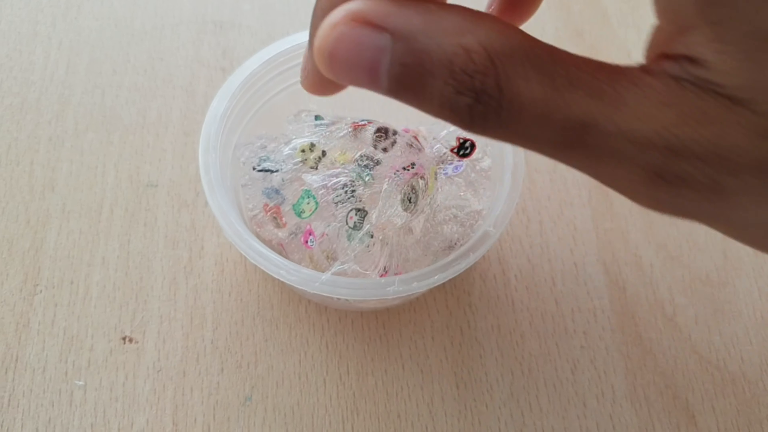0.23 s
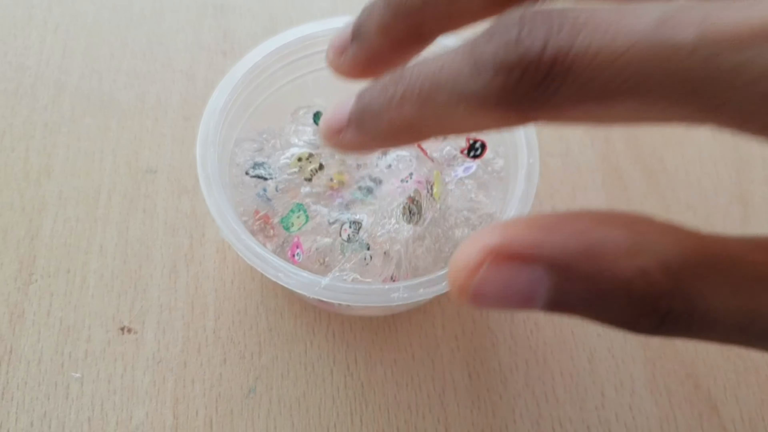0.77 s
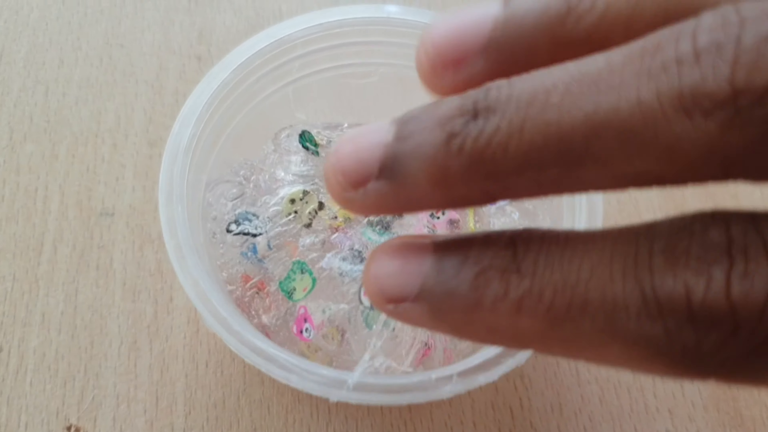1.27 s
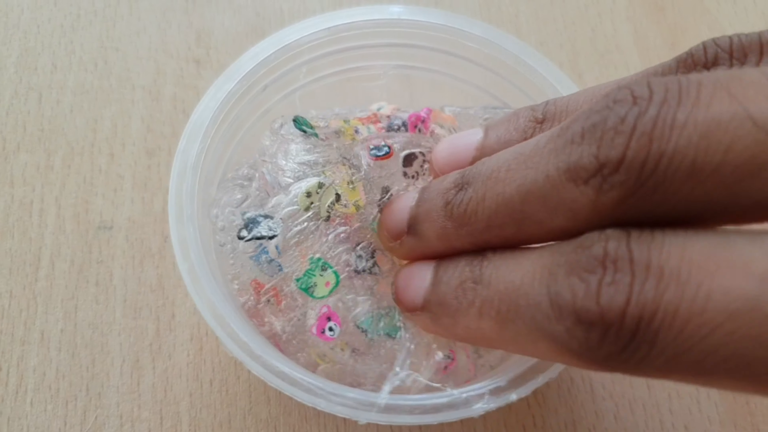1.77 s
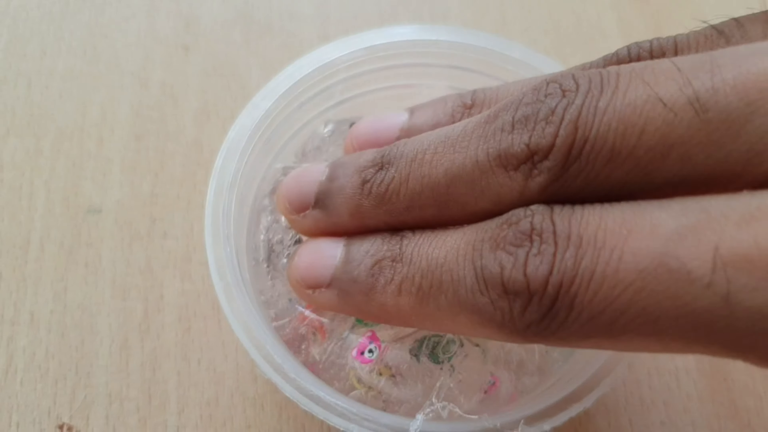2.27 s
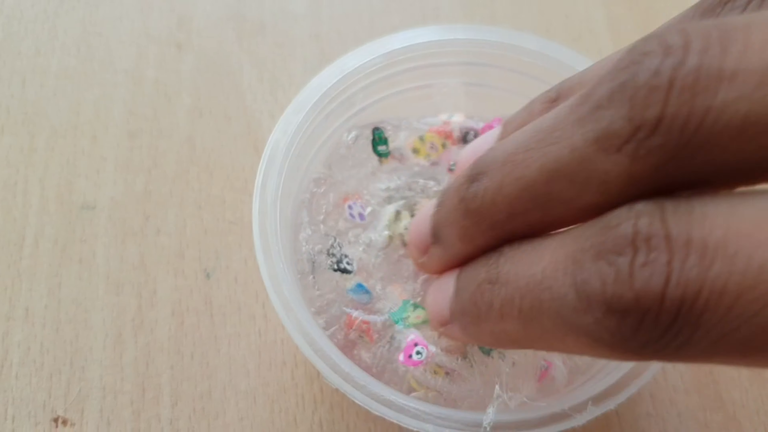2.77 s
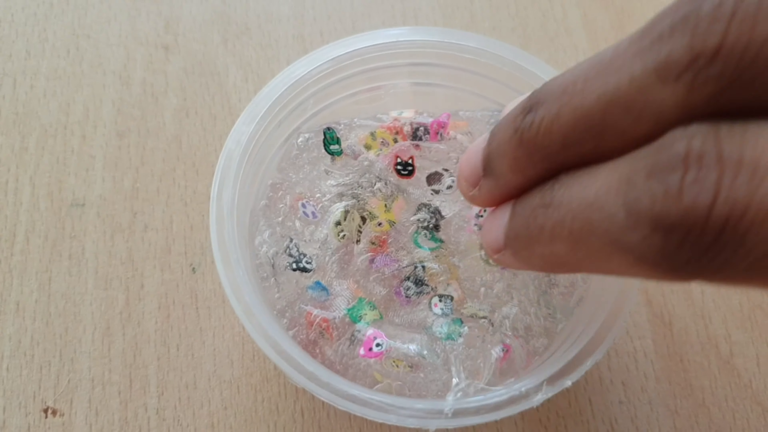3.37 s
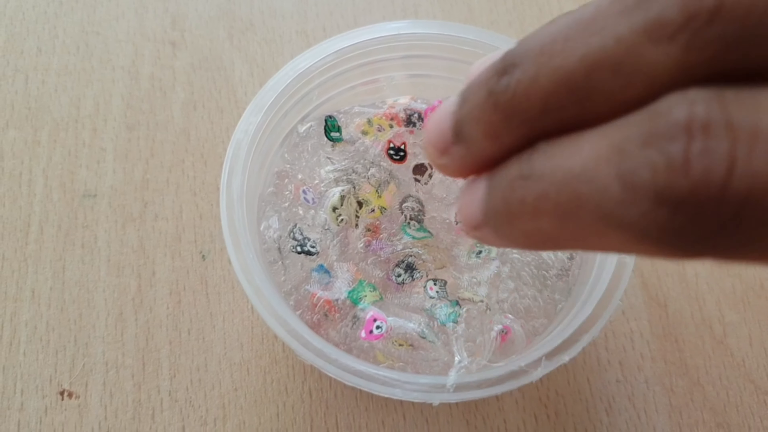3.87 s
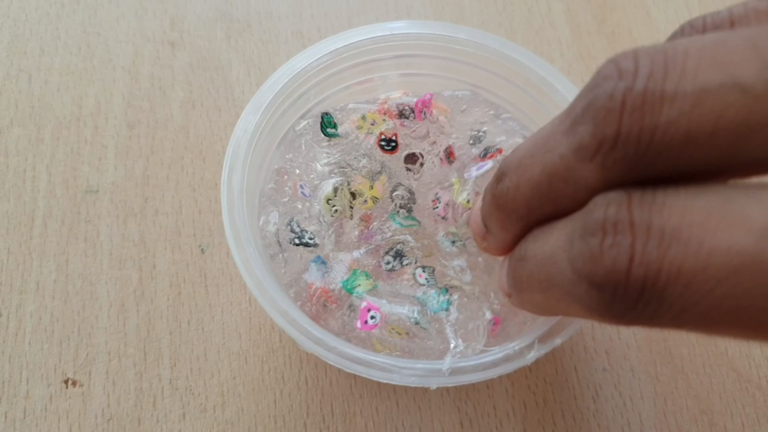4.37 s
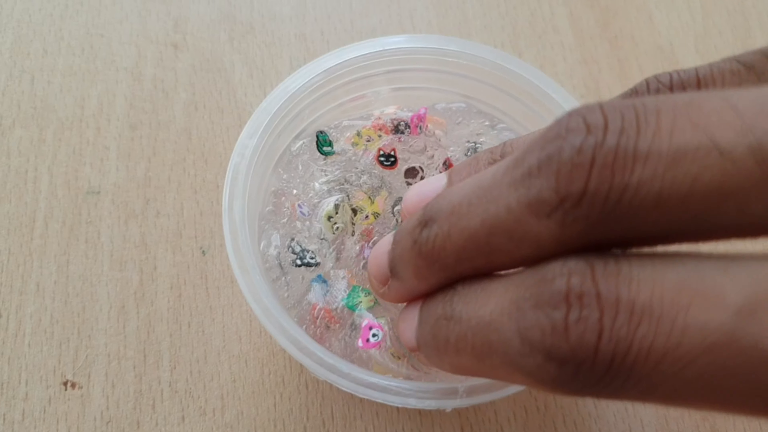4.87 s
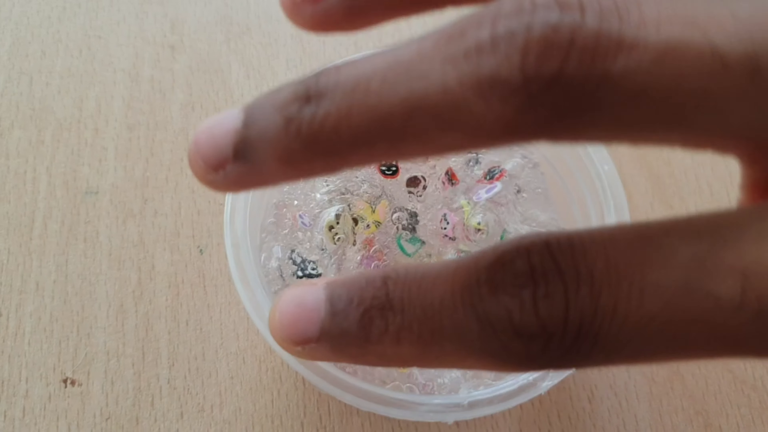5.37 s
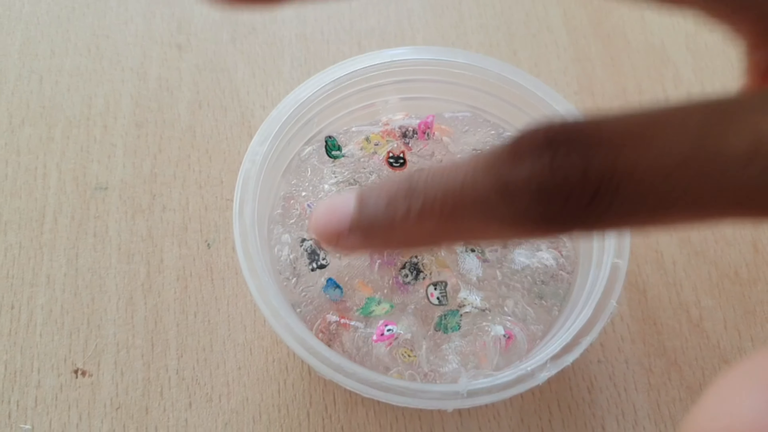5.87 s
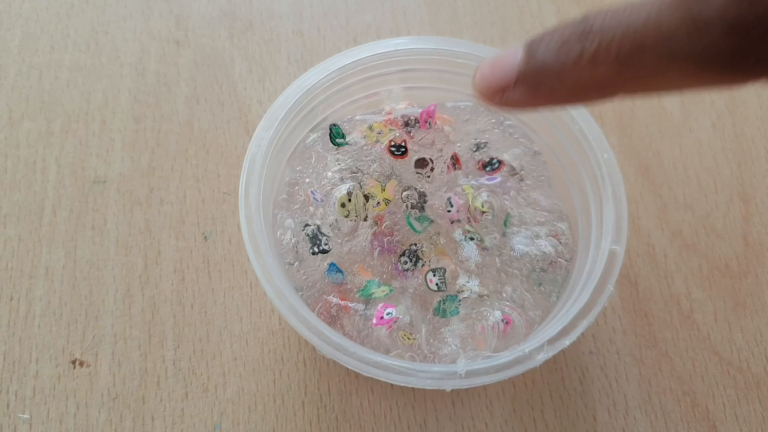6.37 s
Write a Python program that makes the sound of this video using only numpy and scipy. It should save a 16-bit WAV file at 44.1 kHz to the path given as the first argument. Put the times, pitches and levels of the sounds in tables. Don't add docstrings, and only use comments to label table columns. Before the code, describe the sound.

Close wet slime handling: soft sticky crackling, three sharp bubble pops, then a quick crunchy burst of bubbles, in a quiet small room.

```python
import sys
import numpy as np
from scipy import signal
from scipy.fft import rfft, irfft, next_fast_len
from scipy.io import wavfile
from scipy.ndimage import uniform_filter1d, minimum_filter1d

SR = 44100
rng = np.random.default_rng(int(sys.argv[2]) if len(sys.argv) > 2 else 0)


def store_wav(level_fs):
    pcm = np.round(np.clip(np.atleast_2d(level_fs), -1, 1) * 32767)
    wavfile.write(sys.argv[1], SR, pcm.T.astype(np.int16))


def volts(x):
    e = np.asarray(x, float) / 20
    return 10 ** e


N = 291929

# start in seconds, length in seconds,
# peak position as a share of the length, level in dB, dryness in dB.
SMACKS = [(0.051, 0.13, 0.21, -53.5, -4.5), (0.612, 0.14, 0.55, -54, -5), (1.136, 0.11, 0.42, -61, -0.5),
          (1.216, 0.12, 0.62, -54, -5.5), (1.894, 0.053, 0.83, -63.5, -16), (1.935, .075, .55, -57, -13.5),
          (2.517, 0.11, 0.55, -55.5, -6), (2.664, 0.042, 0.84, -60, -16), (2.968, 0.11, 0.4, -62, -6),
          (4.454, 0.093, 0.31, -65.5, -14.5), (4.604, 0.0168, 0.63, -36, -5),
          (4.611, 0.078, 0.44, -47, -15), (5.431, 0.058, 0.06, -60.5, -10.5), (6.255, 0.11, .5, -68, 4)]
# start in seconds, length in seconds,
# peak position as a share of the length, level in dB, dryness in dB.
PEELS = [(0.162, 0.098, .5, -72.5, 6), (0.508, 0.027, 0.14, -58, 3), (0.705, 0.088, 0.55, -56, 2.5),
         (0.758, 0.095, 0.18, -68.5, 5), (1.072, 0.051, 0.5, -75.5, 3), (1.52, .16, 0.5, -67.5, 4),
         (1.655, 0.23, 0.2, -69, 5.5), (1.835, .14, 0.35, -72.5, 7.5), (1.972, 0.059, 0.7, -59, 7),
         (2.619, 0.07, 0.7, -62, 7.5), (3.084, 0.077, 0.59, -68.5, 6), (3.602, 0.19, 0.33, -80, 6.5),
         (3.824, 0.051, 0.7, -73.5, 24), (3.863, 0.031, 0.51, -59.5, 3.5), (4.109, 0.13, 0.42, -76.5, 0.5),
         (4.18, 0.23, 0.3, -68.5, 2), (4.406, 0.081, 0.53, -79, 11.5), (4.508, 0.051, 0.68, -60, 5),
         (4.555, 0.059, 0.7, -55.5, 3), (5.045, 0.15, 0.17, -72.5, 6), (5.123, 0.14, 0.7, -59, 4.5),
         (5.899, 0.069, 0.6, -76.5, 11), (6.186, 0.085, 0.44, -70, 21), (6.35, 0.048, .55, -67, 19.5)]
# frequency in Hz, width in Hz, level in dB.
FILM_RESONANCES = [
    [(560, 210, -14), (812, 110, -6.5), (1100, 410, 2), (1510, 360, 7.5), (2180, 1000, 5.5)],
    [(3220, 990, 0.5), (4350, 510, -7.5)],
    [(5470, 1200, 1), (7146, 1100, 7.5)],
    [(11100, 3000, 5.5), (14000, 2600, -1)],
]
# level in dB, share of the dryness (no unit).
FILM_DRIVE = [
    (-0.74, -.55),
    (-0.95, -0.0044),
    (-1.34, .45),
    (-15, .2),
]
# time in seconds, peak in dB.
POPS = [
    (1.6453, -3),
    (2.0296, -3.5),
    (2.709, 8),
    (3.7403, -21.5),
    (4.6448, -16),
]
# frequency in Hz, level in dB.
POP_COLOURS = [
    [(240, -55.5), (400, -32), (1740, -22), (3060, -8.5), (4830, -15.5), (7030, 3.5), (9460, -18.5),
     (12000, -12), (13400, -19.5), (15900, -5), (16900, -38.5)],
    [(240, -33.5), (400, -3), (1200, 0.5), (2010, -13.5), (2750, -4), (4530, -19.5), (6200, -22),
     (7600, -17.5), (8610, -42.5), (10100, -32), (16900, -46)],
    [(240, -49.5), (400, -4), (947, 3.5), (1980, -4.5), (3060, 0.5), (3760, -9.5), (6100, -10.5),
     (8350, -29.5), (11800, -28.5), (15600, -37), (16900, -58)],
    [(240, -33), (400, -3.5), (4530, -2), (5300, -13.5), (7250, -3), (8480, -17.5), (9460, -28),
     (12700, -23), (15100, -30), (16900, -59)],
    [(240, -55.5), (400, -4), (1360, 11), (2700, 3), (3810, -46), (5380, -5), (14900, -38), (16900, -72)],
]
# delay in seconds, level in dB.
CUP_ECHOES = [(.0005, -17), (.0008, -20), (.0013, -13), (.002, -20.5)]
# time in seconds, peak in dB, pitch in Hz.
TICKS = [(.214, -49, 4700), (.5142, -50, 5350), (.5634, -41.5, 2560), (1.2903, -38, 5300),
         (1.7941, -38, 6870), (1.939, -43, 3100), (1.9731, -34, 1220), (1.9987, -39, 5600),
         (2.0158, -31.5, 3530), (2.2956, -39.5, 2240), (2.6661, -32, 6660), (2.962, -44.5, 2410),
         (3.12, -47.5, 6970), (3.124, -49.5, 10500), (3.8575, -38.5, 6960), (3.876, -45, 6980),
         (3.881, -39.5, 2990), (4.2948, -46, 3050), (4.473, -42, 2384), (5.119, -37.5, 7000),
         (5.1247, -37, 7300), (5.1959, -37.5, 9300), (5.2186, -43, 9900), (5.2363, -33, 1455),
         (5.44, -47, 1540), (5.6339, -42.5, 2430), (5.8015, -59, 7460), (5.936, -49, 7580),
         (6.3759, -51, 7260), (6.3812, -42, 5900)]
# time in seconds, peak in dB, pitch in Hz.
BUBBLE_NEST = [(4.5244, -36.5, 1620), (4.536, -34, 3570), (4.5596, -39, 3340), (4.5683, -26, 3400),
               (4.5786, -29.5, 3680), (4.5803, -32, 3830), (4.609, -35, 2000), (4.6112, -15.5, 1660),
               (4.613, -14.5, 2870), (4.6155, -19, 2933), (4.6235, -23.5, 2320), (4.6304, -22.5, 2340),
               (4.6332, -22, 2780), (4.64, -24.5, 2220), (4.6432, -26, 1600), (4.654, -27, 2040),
               (4.661, -28, 2800), (4.6635, -29, 2430), (4.6686, -40, 2350)]
# time in seconds, peak in dB, weight of the lowest modes in dB,
# push length in seconds.
THUMPS = [(1.652, -61, -13.5, .005), (2.027, -28, -14, 0.0036), (2.712, -20.5, -17, 0.0063),
          (2.998, -70, -19, .015), (3.661, -68, -16.5, 0.0077), (3.738, -42.5, -29.5, 0.0024),
          (3.88, -56.5, -8.5, 0.0055), (4.608, -41.5, 2.5, 0.01), (4.64, -47.5, -3.5, 0.0096),
          (5.214, -64.5, -24, 0.016), (5.438, -65, -17.5, .008), (6.26, -66, -18, 0.024)]
# frequency in Hz, level in dB, 60 dB decay time in seconds.
BOARD_MODES = [(93.8, -21, 0.21), (155, -24, 0.15), (198, -15.5, .4), (306, -4, 0.15), (417, -5.5, 0.0721),
               (445.4, -2, .14), (532, -14, 0.15), (597, -4.5, 0.13), (790, -6, .04), (902, -19, 0.13),
               (988.5, -11.5, 0.028)]
# frequency in Hz, level in dB.
FAR_PORT = [(300, -5.5), (600, -5), (1000, -16), (1550, -7), (2100, -15), (3500, -21), (5000, -13),
            (6200, -25), (7500, -29.5), (9500, -15), (15000, -8)]
# delay in seconds, level in dB.
WALL_ECHOES = [(.0075, -24.5), (.009, -34.5), (0.018, -34.5)]
# frequency in Hz, 60 dB decay time in seconds.
ROOM_T60 = [(100, 0.26), (400, 0.11), (1500, 0.13), (4000, 0.19), (8000, 0.22), (14000, 0.19)]
# frequency in Hz, level in dB.
ROOM_WET = [(100, -26.5), (400, -15.5), (1500, -12), (3000, -18.5), (4800, -21), (6200, -23.5),
            (7500, -25.5), (9500, -17.5), (14000, -13)]
# frequency in Hz, density in dB per Hz.
HUSH = [(25, -99), (45, -93), (65, -83.5), (100, -86.5), (195, -96.5), (250, -105), (400, -110),
        (700, -115), (1200, -118), (4000, -117), (9000, -120), (15000, -118)]
# frequency in Hz, density in dB per Hz.
WHIRR = [(400, -120), (560, -110), (800, -101), (1000, -112), (1200, -112), (1550, -97.5), (1880, -104),
         (2120, -90.5), (2650, -91), (3200, -108), (4200, -113), (6000, -125)]
# time in seconds, whirr level in dB.
GAIN_RIDE = [(0.0, -78), (0.33, -78), (0.79, -76), (1.0, -78), (1.25, -76.5), (2.34, -80), (2.63, -78),
             (2.89, -81), (3.13, -85), (3.45, -86.5), (3.8, -86), (3.93, -80.5), (4.059, -80.5),
             (4.48, -77), (4.98, -79), (5.769, -77), (6.62, -78)]

PULL_STEP = 16
SWELL_DB, FADE_DB, HOLD = 24, 24.5, 0.35
BURST_RISE_S = 0.001
TICK_T60_S, TICK_CRACK_DB = 0.0044, -6
NEST_T60_S, NEST_CRACK_DB = 0.0035, -8
CRACK_DB_PER_OCT = 1.5


def on_log_hz(hz, table):
    table = np.array(table, float)
    return np.interp(np.log(hz + 1), np.log(table[:, 0]), table[:, 1])


def coloured_noise(db_of_hz):
    size = next_fast_len(N)
    hz = np.arange(size // 2 + 1) * SR / size
    spectrum = rfft(rng.standard_normal(N), size) * volts(db_of_hz(hz))
    return irfft(spectrum * np.sqrt(SR / 2), size)[:N]


def causal_colour(x, table):
    size = 1024
    hz = np.arange(size // 2 + 1) * SR / size
    cepstrum = irfft(np.log(volts(on_log_hz(hz, table))), size)
    cepstrum[1:size // 2] *= 2
    cepstrum[size // 2 + 1:] = 0
    response = irfft(np.exp(rfft(cepstrum)), size)[:size // 2]
    return signal.fftconvolve(x, response)[:N]


def resonate(x, hz, width):
    return signal.lfilter(*signal.iirpeak(min(hz, 0.45 * SR), hz / width, SR), x)


def walk(rate):
    k = int(SR / rate)
    w = uniform_filter1d(np.repeat(rng.standard_normal(N // k + 1), k), k)[:N]
    return w / w.std()


def place(shape, s, out):
    i = int(s * SR)
    return out + np.pad(shape, (i, N))[:N]


def pull(start, length, peak, db):
    u = (np.arange(0, N, PULL_STEP) / SR - start) / length
    peak = np.clip(peak, 0.05, 0.95)
    hold_from, hold_to = peak * (1 - HOLD), peak + HOLD * (1 - peak)
    shape_db = np.interp(u, [0, hold_from, hold_to, 1], [-SWELL_DB, 0, 0, -FADE_DB])
    return volts(db + shape_db) * (u > 0) * (u < 1)


def peel():
    out = 0
    spurts = volts(2.0 * walk(220))
    rows = np.array(SMACKS + PEELS)
    dryness_db = rows[:, 4]
    pulls = np.array([pull(*row[:4]) for row in rows])
    for group, (drive_db, share) in zip(FILM_RESONANCES, FILM_DRIVE):
        layer = 0
        for hz, width, db in group:
            sizes = rng.standard_normal(N) * volts(2.0 * rng.exponential(size=N))
            cracks = (rng.random(N) < 0.12) * sizes
            wander = volts(2.6 * walk(35))
            ring = resonate(resonate(cracks, hz, 1.3 * width), hz, 1.6 * width)
            layer = layer + volts(db) * wander * ring / np.sqrt(width)
        level = np.repeat(volts(drive_db + share * dryness_db) @ pulls, PULL_STEP)[:N]
        out = out + volts(1.5) * layer / layer.std() * uniform_filter1d(level, size=128) * spurts
    return out


def pops():
    out = np.zeros(N)
    suck = np.append(-0.16 * np.hanning(12), 1)
    for (s, peak_db), colour in zip(POPS, POP_COLOURS):
        shape = causal_colour(suck, colour)
        out = place(volts(peak_db + 2.0) * shape / abs(shape).max(), s + 0.0012, out)
    return out + sum(volts(db) * np.roll(out, int(s * SR)) for s, db in CUP_ECHOES)


def burst(peak_db, hz, t60, crack_db, chance):
    t = np.arange(len(chance)) / SR
    from_peak = abs(t - BURST_RISE_S)
    ring = np.sin(2 * np.pi * hz * t * (1 + 30 * t)) * np.exp(-np.log(1000) * from_peak / t60)
    crack = np.gradient(uniform_filter1d(chance, size=3)) * np.exp(-from_peak / 0.00043)
    return volts(peak_db) * np.minimum(t / 0.00013, 1) * (ring + volts(crack_db) * crack)


def ticks():
    out = np.zeros(N)
    kinds = (TICKS, TICK_T60_S, TICK_CRACK_DB), (BUBBLE_NEST, NEST_T60_S, NEST_CRACK_DB)
    for table, t60, crack_db in kinds:
        for s, db, hz in table:
            tear_db = crack_db + CRACK_DB_PER_OCT * np.log2(hz / 3000)
            shape = burst(db, hz, t60, tear_db, rng.standard_normal(1024))
            out = place(shape, s - BURST_RISE_S, out)
    return out


def table_thump():
    out = np.zeros(N)
    t = np.arange(SR // 2) / SR
    for s, db, low_db, push_s in THUMPS:
        settling = 0.13 * np.exp(-t / 0.033)
        push = rng.standard_normal(len(t)) * (t / push_s * np.exp(-t / push_s) + settling)
        ring = 0
        for hz, mode_db, t60 in BOARD_MODES:
            mode = resonate(resonate(push, hz, 2.9 / t60), hz, hz / 3.8)
            weight_db = mode_db + (low_db + 21) * (hz < 170)
            ring = ring + volts(weight_db) * mode / abs(mode).max()
        out = place(volts(db - 7.0) * ring, s, out)
    return out


def room(x):
    t = np.arange(SR // 2) / SR
    tail = 0
    for hz in 90 * 2 ** np.arange(0, 7.6, 0.25):
        band = resonate(resonate(rng.standard_normal(len(t)), hz, hz / 4), hz, hz / 4)
        decay = np.exp(-np.log(1000) * t / on_log_hz(hz, ROOM_T60))
        tail = tail + volts(on_log_hz(hz, ROOM_WET) - 24.5) * band * decay
    onset = np.clip((t - 0.002) / 0.0045, 0, 1)
    return signal.fftconvolve(x, tail * onset)[:N]


def hush():
    s, whirr_db = np.transpose(GAIN_RIDE)
    ride_db = np.interp(np.arange(N) / SR, s, whirr_db - np.median(whirr_db))
    ride = volts(ride_db + 0.26 * walk(0.57))

    def shared(hz):
        return np.clip(0.92 - hz / 1200, 0, 1)

    def own_hiss():
        return coloured_noise(lambda hz: on_log_hz(hz, HUSH) + 10 * np.log10(1 - shared(hz)))

    rumble = coloured_noise(lambda hz: on_log_hz(hz, HUSH) + 10 * np.log10(shared(hz) + 1e-9))
    rumble = rumble * volts(0.67 * walk(3.5))
    whirr = coloured_noise(lambda hz: on_log_hz(hz, WHIRR)) * volts(1.3 * walk(16))
    return ride * (rumble + np.array([own_hiss() + whirr, own_hiss()]))


def scene():
    burst_air = pops()
    slime = peel() + burst_air + ticks()
    far_slime = np.roll(causal_colour(slime, FAR_PORT), 7)
    treble = np.gradient(burst_air)
    walls = sum(volts(db) * np.roll(treble, int(s * SR)) for s, db in WALL_ECHOES)
    thump = table_thump()
    near = slime + room(slime) + volts(4.5) * thump
    far = far_slime + volts(-4) * room(slime) + volts(0.45) * thump
    return np.array([near, far]) + walls + hush()


def band_limit(x):
    return signal.sosfilt(signal.butter(12, 17040, fs=SR, output="sos"), x)


def record(dry):
    reach = -minimum_filter1d(-abs(dry).max(axis=0), size=97)
    gain = uniform_filter1d(np.minimum(0.96 / (reach + 1e-9), 1), size=49)
    held = dry * gain
    low_pass = signal.ellip(8, 0.1, 40, 15600, fs=SR, output="sos")
    low = signal.sosfiltfilt(low_pass, held)
    finished = low + volts(-18) * (held - low)
    return band_limit(finished)


dry = scene()
out = record(dry)
store_wav(out)
```